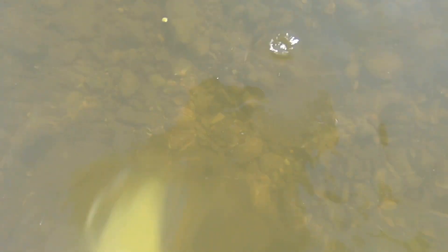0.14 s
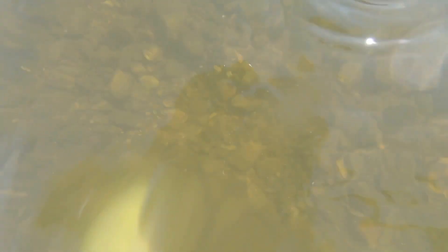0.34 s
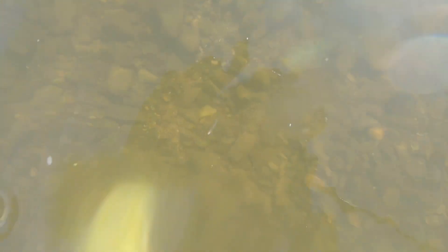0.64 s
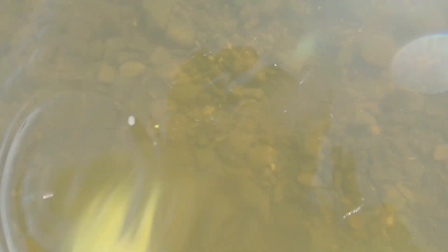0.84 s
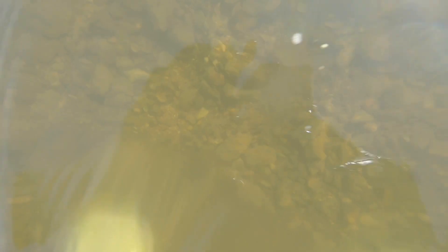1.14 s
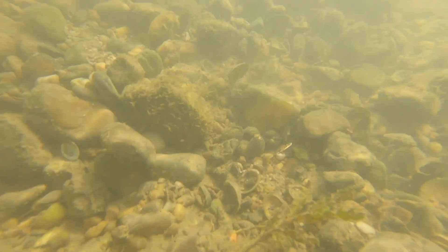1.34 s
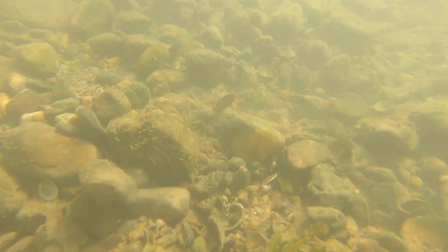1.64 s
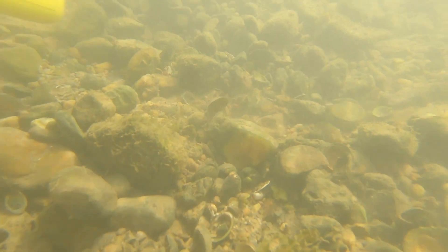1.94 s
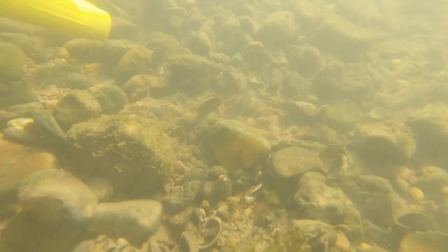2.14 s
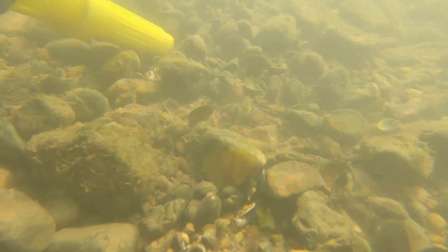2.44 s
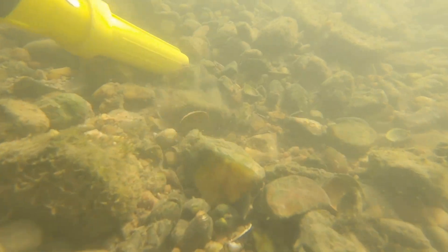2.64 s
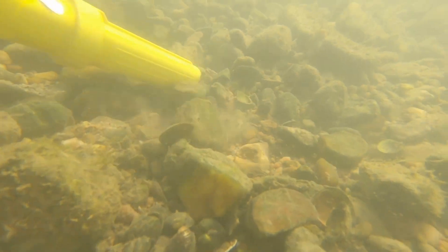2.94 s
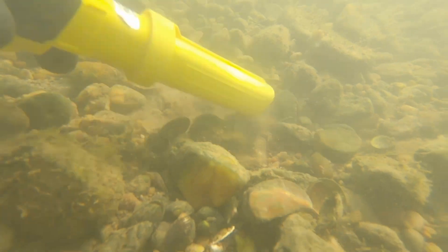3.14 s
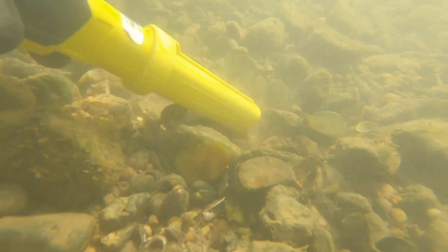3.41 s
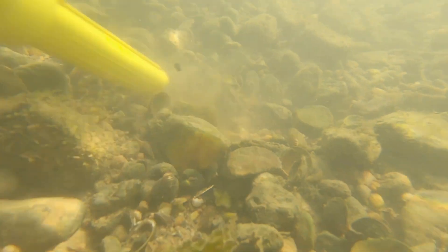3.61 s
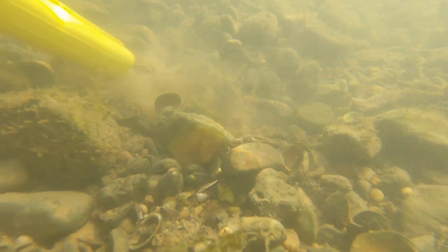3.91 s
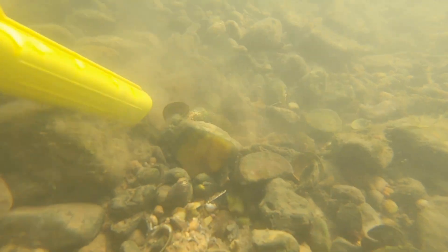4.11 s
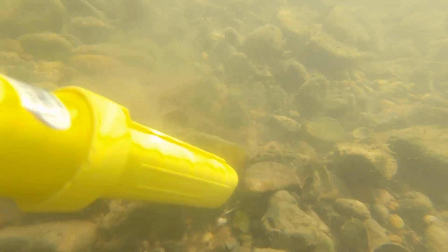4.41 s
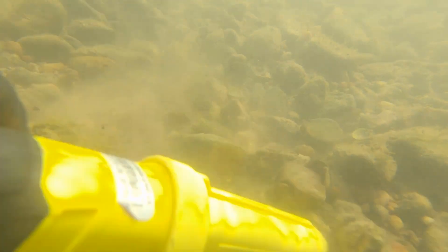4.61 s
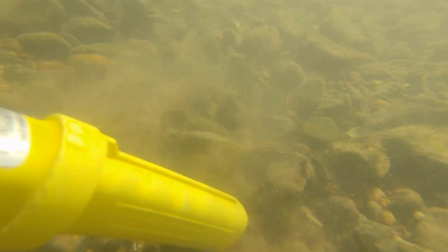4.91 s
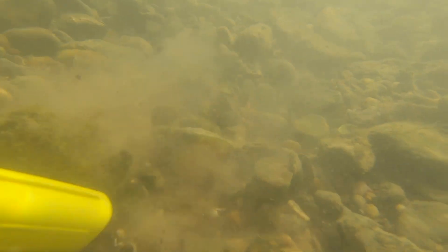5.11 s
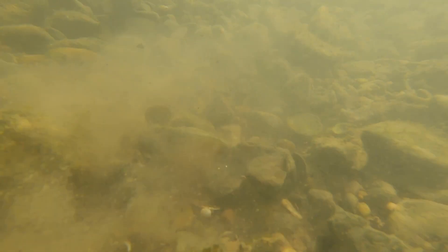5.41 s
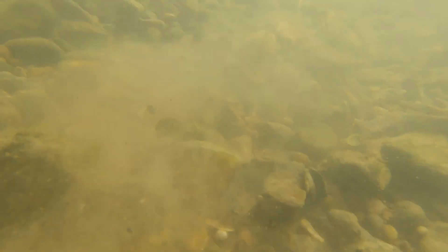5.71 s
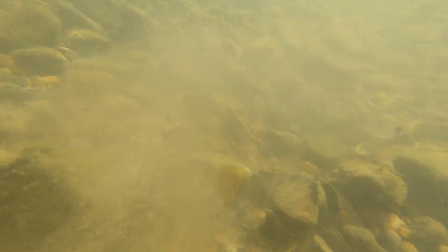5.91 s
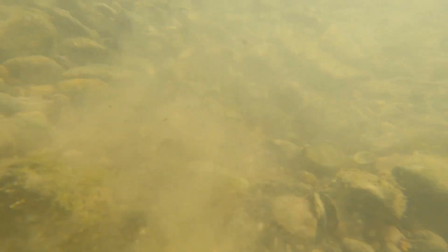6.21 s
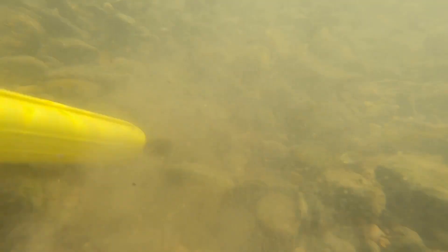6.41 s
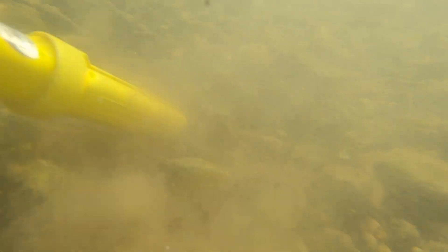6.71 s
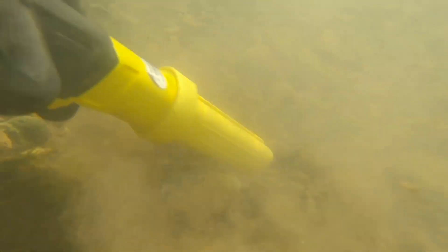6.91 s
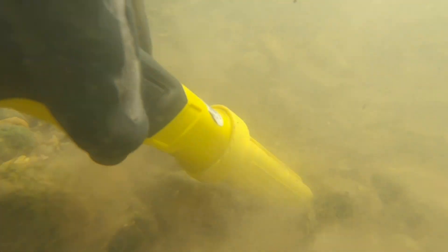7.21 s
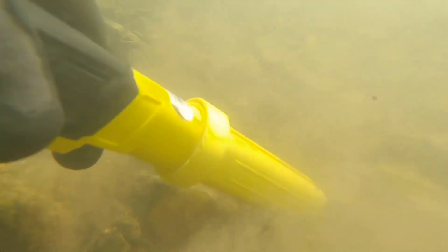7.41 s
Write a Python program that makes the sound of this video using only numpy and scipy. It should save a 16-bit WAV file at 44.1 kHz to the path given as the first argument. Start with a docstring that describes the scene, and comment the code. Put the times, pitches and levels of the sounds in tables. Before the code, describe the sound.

From 0 to 1.2 seconds, quiet creek water laps in open air, low and soft, with tiny pitched drips and a low bloop near 0.95. At about 1.2 a loud, crisp splash of droplets cuts abruptly to a muffled underwater sound inside a waterproof case. Until 2.3 there are only faint pebble scrapes, small knocks, a fading bubbly fizz and low rumble. A hard hollow knock lands at 2.55, another boomy one at 2.85, then a tight rattling cluster around 3.25 and a knock at 3.7. After a sharp clack at 4.1, digging thickens from 4.35 to 5.2: grinding gravel, crowded clacks and deep thuds. Gritty scraping and a strong booming cluster come at 5.6-5.7, a lull near 6, more heavy knocks at 6.4-6.5, a thump at 6.8, then clacks at 7.05 and 7.2 over deep, lumpy silt churning until about 7.5.

```python
"""A plastic probe digs in the bed of a shallow creek: gravel grinds, stones knock and silt churns.
Each contact is a train of impulses that excites the resonances of a submerged waterproof case,
heard as a thud, a boom of its walls, a hollow clack, a tick and fine grit.
Before the case dips under, creek water laps as filtered noise; random clicks make faint crackles at
the surface and the loud splash of the dive. Drips, bubbles and lead-ins to knocks are short gliding tones."""
import sys
import numpy as np
from scipy import signal
from scipy.io import wavfile
from scipy.ndimage import uniform_filter1d

SR = 44100
rng = np.random.default_rng(int(sys.argv[2]) if len(sys.argv) > 2 else 0)


def wrap_up_sound(samples):
    """Save the sound to the file named by the first command line argument, as 16-bit audio."""
    columns = np.atleast_2d(samples).T
    # keep every value between -1 and 1, then stretch to whole-number steps
    tamed = np.clip(columns, -1, 1)
    steps = np.round(tamed * 32767).astype(np.int16)
    wavfile.write(sys.argv[1], SR, steps)


N = 332955
DIVE_S = 1.245   # the case goes under water

# resonant modes of the submerged case, from lowest to highest family:
# (frequency [Hz], bandwidth [Hz], relative level [dB])
THUD_MODES = [(26.9, 29, -1.5), (50, 49.8, 0), (85, 49.4, -2.5), (124.1, 40.3, -8.5)]
BOOM_MODES = [(237.8, 32.4, 0.5), (270.8, 33, -3), (307.1, 22, -4)]
CLACK_MODES = [(455.7, 73, 7.5), (531.7, 104.4, 7.5), (625, 58, 4), (720, 65, 1.5), (1010, 190, -21),
               (1060, 70, -26.5)]
TICK_MODES = [(1403, 68, -2), (1740, 170, 1), (1950, 440, 1.5), (2290, 400, -4)]
GRIT_MODES = [(3244, 150, 4), (3430, 180, -7.5), (3673, 270, -9.5), (4070, 440, -7.5), (4530, 390, -14),
              (5840, 760, -25.5), (8760, 950, -29.5)]
# how sandy the bed is under the tip, before the trims of each source:
# (time [s], grit above the tick [dB], ring of the probe above the tick [dB])
SAND_CURVE = [(1.25, -9.5, -16), (2.2, -5, -6), (2.32, -8.5, 5), (3.3, -3, 6.5), (4.65, -6, -8),
              (5.0, -0.5, 2), (5.87, 2, 0), (6.2, -8.5, 1), (6.42, 4, -9), (6.6, -10, -10), (7.12, -4.5, 5),
              (7.55, -15.5, -5)]


def from_db(db):
    """Amplitude gain is ten to the power of the level over 20."""
    return 10 ** (np.asarray(db) / 20)


def rms_one(x):
    """Dividing by the root mean square gives unit effective amplitude."""
    return x / np.sqrt(np.mean(x ** 2) + 1e-20)


def in_time(rows):
    """Linear interpolation turns each column of a curve into a value per sample."""
    s, *columns = np.transpose(rows)
    return [np.interp(np.arange(N) / SR, s, column) for column in columns]


def drift(rate_hz):
    """Low-passed noise: a double pole leaves a slow random fluctuation of unit rms."""
    step = 40   # samples between the points of the slow signal
    settle = 2000
    r = np.exp(-2 * step * np.pi * rate_hz / SR)
    white = rng.standard_normal(N // step + settle + 2)
    slow = rms_one(signal.lfilter([1], [1, -2 * r, r * r], white)[settle:])
    return np.interp(np.arange(N) / step, np.arange(len(slow)), slow)


def band(x, low_hz, high_hz, order=2):
    """Butterworth band-pass: a maximally flat passband."""
    edges = [low_hz, min(high_hz, .45 * SR)]
    sos = signal.butter(order, edges, "band", fs=SR, output="sos")
    return signal.sosfilt(sos, x + 1e-18)


def resonate(x, modes):
    """Modal superposition: damped two-pole resonators in parallel, with alternating sign."""
    out = 0
    for k, (hz, width_hz, db) in enumerate(modes):
        r = np.exp(-np.pi * width_hz / SR)
        poles = [1, -2 * r * np.cos(2 * np.pi * hz / SR), r * r]
        gain = (-1) ** k * from_db(db) * (1 - r * r) / 2
        out = out + gain * signal.lfilter([1, 0, -1], poles, x + 1e-18)
    return out


def grains(per_s, spread_db):
    """Shot noise: randomly timed impulses, many small and a few large; unit rms."""
    sizes = from_db(spread_db * np.minimum(rng.exponential(1, N), 4))
    signed = sizes * rng.choice([-1, 1], N)
    return rms_one(signed * (rng.random(N) < per_s / SR))


def coloured(sources, spectrum, patchy_db):
    """Spectral shaping in third-octaves, drawn in turn from two sources, each level flickering; unit rms."""
    hz, db = np.transpose(spectrum)
    edges = np.geomspace(22, 16000, 29)
    run_in = np.pad(sources, [(0, 0), (SR // 5, 0)], "wrap")   # lets the filters settle
    out = 0
    for k, (low, high) in enumerate(zip(edges, edges[1:])):
        log_centre = np.log(low * high) / 2
        level_db = np.interp(log_centre, np.log(hz), db, left=-60)
        part = band(run_in[k % 2], low, high, order=3)[-N:]
        out = out + part * from_db(level_db + patchy_db * drift(6.5))
    return rms_one(out)


def swells(events, attack_s, release_s):
    """Exponential rise and decay around (start, length, dB) events; the strongest one rules."""
    t, gain = np.arange(0, N, 16) / SR, 0
    for start, length, db in events:
        before = np.maximum(start - t, 0)
        after = np.maximum(t - start - length, 0)
        gain = np.maximum(gain, from_db(db) * np.exp(-before / attack_s - after / release_s))
    return np.interp(np.arange(N) / SR, t, gain)


def through_case(x, low_hz, high_hz, order=2):
    """Band-limited transmission; between boom and clack the walls cancel each other in a notch."""
    null_hz, null_width_hz = 354.5, 77
    null = signal.iirnotch(null_hz, null_hz / null_width_hz, fs=SR)
    return signal.lfilter(*null, band(x, low_hz, high_hz, order=order))


def grinding(modes, force, low_hz, high_hz, even_s, order=2):
    """Modes driven by many slips: their balance wanders while the short-term rms is evened to 1."""
    rings = 0
    for k, mode in enumerate(modes):
        wandering = force * from_db(3.5 * drift(16))
        rings = rings + (-1) ** k * resonate(wandering, [mode])
    sound = through_case(rings, low_hz, high_hz, order=order)
    mean_power = uniform_filter1d(sound ** 2, max(int(even_s * SR), 2))
    return sound / np.sqrt(np.abs(mean_power) + 1e-12)


def knocks(modes, times, peak_db, low_hz, high_hz, rattle, rattle_s, pitches_hz=None, focus_db=0):
    """Impact excitation: a short random build-up, a hit and a rattle convolved with randomly weighted modes."""
    build_up_s = 0.0036   # growth time of the build-up
    out = np.zeros(N + SR)
    t = np.arange(-SR // 60, SR // 25) / SR
    click = signal.unit_impulse(SR // 10)
    rings = np.array([(-1) ** k * through_case(resonate(click, [mode]), low_hz, high_hz)
                      for k, mode in enumerate(modes)])
    shares_db = 3.5 * rng.standard_normal((len(times), len(modes)))
    if pitches_hz is not None:      # a stone favours the modes near its own pitch
        octaves_off = np.abs(np.log2(np.array(modes)[:, 0] / pitches_hz[:, None]))
        shares_db = shares_db - focus_db * octaves_off
    envelope = np.exp(-np.where(t < 0, -t / build_up_s, t / rattle_s))
    chance = rng.standard_normal((len(times), 2, len(t)))
    for s, db, share_db, (touch, size) in zip(times, peak_db, shares_db, chance):
        blow = (t == 0) + rattle * size * (touch > 2) * envelope
        sound = signal.fftconvolve(blow, from_db(share_db) @ rings)
        start = round((s + t[0]) * SR)
        out[start:][:len(sound)] += from_db(db) * sound / np.abs(sound).max()
    return out[:N]


def effort(share):
    """Power sum of scraping and creeping, for resonances that feel this share of the sharpness."""
    # scrapes through the gravel; sharpness is how much the contact favours the treble:
    # (start [s], length [s], force [dB], sharpness [dB])
    scrape_rows = [(1.233, 0.11, -38.5, 2), (1.476, 0.19, -39.5, 10), (1.676, 0.065, -44, 2),
                   (2.099, 0.092, -45, -3), (2.31, 0.03, -29, 2.5), (2.359, .095, -29.5, 2.5),
                   (2.524, 0.12, -26.5, 3.5), (2.755, 0.21, -35, 2), (3.003, 0.079, -42, 13),
                   (3.207, 0.071, -22, 2), (3.298, 0.055, -32, -0.5), (3.495, 0.075, -28, -5.5),
                   (3.592, 0.051, -34, 6), (3.703, 0.062, -29.5, 3), (3.749, 0.098, -34.5, 9),
                   (4.358, 0.37, -20, -4), (4.559, .07, -17, -7), (4.656, 0.051, -17.5, 0.5),
                   (4.721, 0.059, -21, -3), (4.875, .08, -26.5, -4), (4.951, 0.24, -23.5, -5.5),
                   (5.168, .11, -26, -8), (5.284, 0.12, -38.5, -9), (5.392, 0.093, -30, -7.5),
                   (5.58, 0.032, -24, 8), (5.643, 0.063, -23, 3.5), (5.807, .05, -30, -2),
                   (5.843, 0.077, -24.5, 3.5), (5.991, .13, -30, 1), (6.192, 0.063, -22, 4.5),
                   (6.312, 0.15, -29, 0.5), (6.422, 0.12, -22, -14), (6.56, 0.15, -34, -5.5),
                   (6.66, 0.075, -25.5, -6.5), (6.767, 0.061, -32, -10), (6.805, 0.1, -24.5, -6),
                   (7.051, 0.11, -25.5, -4), (7.198, 0.041, -20, -9.5), (7.309, 0.61, -31.5, -11.5),
                   (7.452, 0.033, -23, -9.5)]
    # loose pebbles creeping between the scrapes: (time [s], force [dB])
    creep_curve = [(1.25, -48), (1.95, -53.5), (2.4, -39.5), (3.2, -45.5), (3.85, -40), (4.0, -50.5),
                   (4.28, -42.5), (4.6, -36.5), (5.8, -38.5), (6.15, -46.5), (7.0, -53.5), (7.3, -43.5)]
    creep_sharpness_db = 1.5
    scrapes = [(start, length, force_db + share * sharp_db)
               for start, length, force_db, sharp_db in scrape_rows]
    creep_db, = in_time(creep_curve)
    creeping = from_db(creep_db + share * creep_sharpness_db)
    return np.hypot(swells(scrapes, attack_s=0.0028, release_s=.013), creeping)


def gravel():
    """Stick and slip: pebbles give way in clumps with sand between; one effort drives all resonances."""
    # ring of the probe tube: (frequency [Hz], bandwidth [Hz], relative level [dB])
    probe_modes = [(1075, 62, 5.5), (1234, 20, -10.5)]
    grit_db, probe_db = in_time(SAND_CURVE)
    boom = effort(0)
    thud = from_db(-1) * boom
    clack = from_db(-7.5) * effort(0.63)
    tick = from_db(-37.5) * effort(0.94)
    probe = tick * from_db(probe_db + 4.5)
    grit = tick * from_db(grit_db - 1.0)
    slips = from_db(1.4 * drift(58))
    pebbles = slips * grains(per_s=750, spread_db=4)
    sand = slips * grains(per_s=1900, spread_db=2.0)
    both = pebbles + 0.64 * sand
    out = thud * grinding(THUD_MODES, pebbles, low_hz=53, high_hz=190, even_s=0.059)
    out += boom * grinding(BOOM_MODES, pebbles, low_hz=138, high_hz=388, even_s=0.046)
    out += clack * grinding(CLACK_MODES, pebbles, low_hz=353, high_hz=987, even_s=0.037, order=3)
    out += probe * grinding(probe_modes, sand, low_hz=840, high_hz=1430, even_s=0.13)
    out += tick * grinding(TICK_MODES, both, low_hz=1080, high_hz=2980, even_s=0.13)
    return out + grit * grinding(GRIT_MODES, both, low_hz=2660, high_hz=9900, even_s=0.13)


def stones():
    """Impact of single stones on all mode families, from thud to grit."""
    # stones knocked by the probe, levels before the trims below:
    # (time [s], clack level [dB], boom level [dB], tick level [dB], pitch of the clack [Hz])
    knock_rows = [(1.298, -22.5, -27, -49, 530), (1.334, -24, -30, -51, 713), (1.377, -28.5, -35, -55, 558),
                  (1.463, -27, -36, -36, 527), (1.62, -26.5, -22, -63, 466),
                  (1.728, -34.5, -27.5, -53, 552), (1.833, -28, -28.5, -55, 524),
                  (2.202, -31, -32, -71, 587), (2.314, -26, -16, -56, 490), (2.38, -18.5, -25.5, -39, 450),
                  (2.539, -5.5, -7.5, -30, 545), (2.581, -19, -32.5, -45, 530), (2.637, -11, -14, -61, 501),
                  (2.849, -15.5, -6.5, -37, 482), (3.044, -44, -13.5, -64, 535),
                  (3.133, -26, -17, -52, 545), (3.208, -19.5, -11, -46.5, 675),
                  (3.222, -9.5, -13, -51, 634), (3.244, -13, -18, -44, 537), (3.26, -11, -2.5, -35, 503),
                  (3.276, -15, -13.5, -38.5, 634), (3.323, -23.5, -23.5, -43.5, 530),
                  (3.532, -17, -15, -42.5, 564), (3.606, -28, -18.5, -61, 505), (3.711, -9, -7.5, -33, 655),
                  (4.092, -8.5, -2.5, -32, 597), (4.1, -13, -19.5, -56, 514), (4.359, -11, -8, -49, 574),
                  (4.391, -13, -12.5, -27, 565), (4.452, -20.5, -4, -70, 520),
                  (4.466, -19, -17, -38.5, 550), (4.537, -15.5, -9.5, -43, 680),
                  (4.615, -7, -18.5, -41.5, 667), (4.645, -14.5, -20, -43, 705),
                  (4.69, -21, -10.5, -40, 657), (4.77, -21.5, -17.5, -51.5, 570),
                  (4.971, -16, -17.5, -30.5, 730), (5.03, -22, -25, -37, 714),
                  (5.137, -18, -15.5, -35.5, 625), (5.442, -20.5, -16.5, -36, 647),
                  (5.504, -23.5, -14, -47.5, 600), (5.586, -25, -8.5, -37, 630),
                  (5.602, -12, -16, -31.5, 603), (5.65, -16, -18, -41, 607),
                  (5.664, -14.5, -5.5, -26.5, 574), (5.698, -31, -16, -33.5, 614),
                  (5.712, -11, 1, -35, 588), (5.79, -25, -27, -70, 680), (6.055, -33, -16.5, -45.5, 706),
                  (6.086, -24.5, -30, -58, 710), (6.187, -26.5, -24, -60.5, 630),
                  (6.273, -20, -16.5, -62.5, 523), (6.322, -30.5, -13.5, -52, 596),
                  (6.347, -29, -28, -34, 555), (6.378, -10, -5.5, -28.5, 652),
                  (6.395, -21, -11.5, -49, 510), (6.442, -20, -4, -35, 480), (6.495, -19.5, -5.5, -50, 595),
                  (6.517, -8.5, -6, -36.5, 588), (6.758, -24.5, -24, -38.5, 570),
                  (6.833, -21.5, -13.5, -53.5, 562), (6.897, -28, -22, -50, 593),
                  (7.035, -10, -7, -39, 686), (7.212, -18.5, -7, -59, 510), (7.225, -19.5, -22, -51, 496)]
    s, clack_db, boom_db, tick_db, pitch_hz = np.transpose(knock_rows)
    sand_s, sand_db, _ = np.transpose(SAND_CURVE)
    grit_db = tick_db - 10 + np.interp(s, sand_s, sand_db)
    # low bands start a few milliseconds early, so that their slower build-up meets the tick
    out = knocks(THUD_MODES, s - .005, boom_db - 12, low_hz=35, high_hz=178, rattle=0.16, rattle_s=0.0096)
    out += knocks(BOOM_MODES, s - .0029, boom_db - 4.5, low_hz=134, high_hz=360,
                  rattle=0.25, rattle_s=0.013)
    out += knocks(CLACK_MODES, s - .001, clack_db + .5, low_hz=340, high_hz=923,
                  rattle=0.13, rattle_s=0.013, pitches_hz=pitch_hz, focus_db=26.5)   # dB per octave
    out += knocks(TICK_MODES, s, tick_db - .5, low_hz=1020, high_hz=2600, rattle=0.22, rattle_s=0.0049)
    return out + knocks(GRIT_MODES, s, grit_db, low_hz=2960, high_hz=9900, rattle=1.0, rattle_s=0.0039)


def thumps():
    """Soft low-frequency excitation: the bed gives way, shoves the case and rings its lowest modes only."""
    # (time [s], peak level [dB])
    thump_rows = [(1.331, -16.5), (1.569, -22), (2.122, -21), (3.391, -21), (3.857, -14.5), (4.355, -8),
                  (4.459, -7.5), (4.906, -15), (4.965, -10), (5.036, -8), (5.283, -15), (5.328, -13),
                  (5.435, -14), (5.498, -9.5), (5.59, -9.5), (5.665, -13), (5.882, -12), (6.397, -9.5),
                  (6.673, -15), (6.826, -8), (7.22, -10)]
    s, db = np.transpose(thump_rows)
    return knocks(THUD_MODES, s, db, low_hz=27.2, high_hz=178, rattle=0.054, rattle_s=0.0056)


def silt():
    """Random forcing of the lowest modes: stirred water and silt make a deep, lumpy rumble."""
    # silt churning around the case: (time [s], level [dB])
    churn_curve = [(1.25, -38), (1.35, -28.5), (1.5, -35.5), (1.7, -27.5), (1.8, -35), (2.25, -35),
                   (2.39, -24.5), (2.7, -32), (3.15, -30), (3.33, -23), (3.65, -41.5), (3.82, -23.5),
                   (4.0, -37.5), (4.55, -19.5), (4.83, -28.5), (5.35, -22.5), (6.7, -29), (6.98, -36.5),
                   (7.15, -23), (7.55, -28)]
    churn_db, = in_time(churn_curve)
    eddies = grains(per_s=550, spread_db=1.5)
    return from_db(churn_db) * grinding(THUD_MODES, eddies, low_hz=21, high_hz=126, even_s=0.11)


def froth():
    """Shot noise: a fizz of small bubbles fades after the dive, with short crackling clicks."""
    # spectrum of fizz and clicks: (frequency [Hz], relative level [dB])
    froth_spectrum = [(500, -8.5), (750, -4), (1100, 0.5), (1500, -8.5), (2200, -16.5), (3000, -21.5),
                      (4500, -40.5), (9000, -57)]
    # short crackling clicks, most of them together with a knock: (start [s], length [s], level [dB])
    crackle_rows = [(1.331, 0.0039, -49), (1.37, 0.0067, -59), (1.465, 0.00081, -38), (1.625, 0.051, -52.5),
                    (1.731, 0.0053, -45.5), (1.832, 0.0062, -43)]
    fizz_db, fade_db_per_s = -53.5, 34
    under_s = np.maximum(np.arange(N) / SR - DIVE_S, 0)
    fizz = from_db(fizz_db - fade_db_per_s * under_s)
    crackles = swells(crackle_rows, attack_s=0.00056, release_s=0.0047)
    pops = [grains(per_s=1600, spread_db=2.0) for _ in range(2)]
    return (fizz + crackles) * coloured(pops, froth_spectrum, patchy_db=5.0)


def gliding_tones():
    """Damped oscillation: a tone swells, glides and decays; before the dive a wet noise tick joins it."""
    # drips, bubbles and short pitched tones leading into knocks; the glide lasts two lengths:
    # (start [s], tone peak [dB], pitch [Hz], length [s], rise per length [octaves])
    tone_rows = [(0.035, -50, 2490, 0.033, 0.11), (0.061, -45, 1510, 0.018, 0.098),
                 (0.087, -44, 1820, 0.013, 0.15), (0.228, -34.5, 1020, 0.0057, 0.013),
                 (0.283, -52.5, 2010, 0.016, 0.33), (0.603, -41, 1670, 0.0017, 0.066),
                 (0.612, -38, 1490, 0.0021, 0.13), (0.682, -37.5, 735, 0.01, 0.067),
                 (0.821, -46, 2480, 0.0018, 0.044), (0.914, -39, 2000, 0.0027, 0.072),
                 (0.958, -20.5, 190, 0.013, 0.12), (1.022, -30, 1700, 0.0025, 0.068),
                 (1.07, -29, 190, 0.044, -0.24), (1.283, -29.5, 824, 0.0098, -0.24),
                 (1.353, -31, 315, 0.058, -0.091), (1.371, -47, 1460, 0.0067, 0.15),
                 (1.542, -26.5, 538, 0.017, -0.081), (2.119, -29.5, 407, 0.016, -0.16),
                 (2.125, -27.5, 177, 0.036, 0.0053), (2.782, -59, 2600, 0.01, 0.08),
                 (3.637, -21.5, 467, 0.014, -0.024), (4.073, -20.5, 516, 0.02, -0.18),
                 (7.018, -26.5, 540, 0.025, 0.059)]
    out, t = np.zeros(N), np.arange(SR // 4) / SR
    whites = rng.standard_normal((len(tone_rows), len(t)))
    for (s, db, hz, length, rise), white in zip(tone_rows, whites):
        age = t / length
        pitch_hz = hz * 2 ** (rise * np.minimum(age, 2))
        tone = np.sin(2 * np.pi * np.cumsum(pitch_hz) / SR)
        swell = age ** 2 * np.exp(-4.5 * age)
        wet = .4 * (s < DIVE_S) * rms_one(band(white, hz / 2, 1.5 * hz))
        out[round(s * SR):][:len(t)] += from_db(db) * swell / swell.max() * (tone + wet)
    return out


def splash():
    """Shot noise of bursting droplets: dense crackles shaped by a bright spectrum."""
    # spectrum of the droplets: (frequency [Hz], relative level [dB])
    droplet_spectrum = [(600, -28.5), (1000, -16.5), (1350, -4.5), (2000, -5.5), (2600, -6.5), (3300, 0.5),
                        (4300, -12.5), (5500, -19), (7000, -32), (8500, -30), (11000, -45.5), (15000, -59)]
    # faint crackles at the surface and the loud splash of the dive: (start [s], length [s], level [dB])
    splash_rows = [(.01, 0.083, -62.5), (.995, .025, -59), (1.025, .1, -48.5), (1.165, .025, -45.5),
                   (1.197, .019, -17)]
    droplets = [grains(per_s=3500, spread_db=3.5) for _ in range(2)]
    gain = swells(splash_rows, attack_s=0.0066, release_s=0.0093)
    return gain * coloured(droplets, droplet_spectrum, patchy_db=3.5)


def creek():
    """Broadband noise shaped in frequency and time: running water laps near the case."""
    # spectrum of the creek in open air: (frequency [Hz], relative level [dB])
    creek_spectrum = [(25, -7.5), (80, -6), (110, -13), (150, -2.5), (192, 1.5), (250, -10), (400, -11.5),
                      (700, -17), (1300, -34), (2200, -36.5), (3200, -41), (4100, -37), (5500, -50.5),
                      (10500, -70.5), (12800, -50), (15000, -61.5)]
    # its loudness: (time [s], level [dB])
    creek_curve = [(0, -37.5), (0.25, -40), (0.5, -39), (0.7, -39), (0.95, -38.5), (1.1, -36), (1.18, -42)]
    level_db, = in_time(creek_curve)
    water = coloured(rng.standard_normal((2, N)), creek_spectrum, patchy_db=1.0)
    return from_db(level_db) * water


def scene():
    """Superposition: open air first, then the creek bed, with gliding tones over a faint hiss."""
    under, = in_time([(DIVE_S - .002, 0), (DIVE_S + .002, 1)])
    surface = creek() + splash()
    bed = silt() + gravel() + stones() + thumps() + froth()
    hiss = from_db(-101) * rng.standard_normal(N)
    return ((1 - under) * surface + under * bed + gliding_tones() + hiss)[None]


def record(dry):
    """Soft saturation rounds the loudest peaks; a steep low-pass cuts the top."""
    ceiling, cutoff_hz = .95, 15300
    rounded = dry / (1 + (dry / ceiling) ** 8) ** (1 / 8)
    low_pass = signal.cheby2(12, 70, cutoff_hz, fs=SR, output="sos")   # 70 dB down from the cutoff up
    return signal.sosfilt(low_pass, rounded)


dry = scene()
out = record(dry)
wrap_up_sound(out)
```